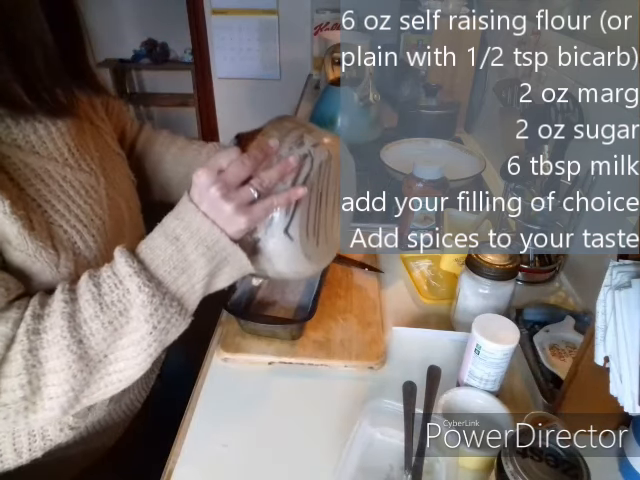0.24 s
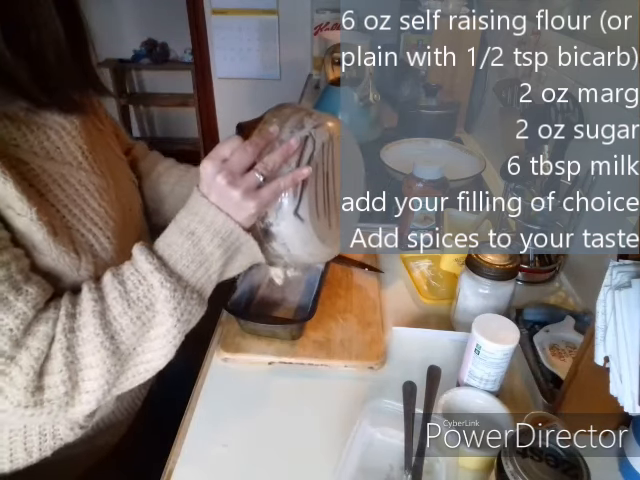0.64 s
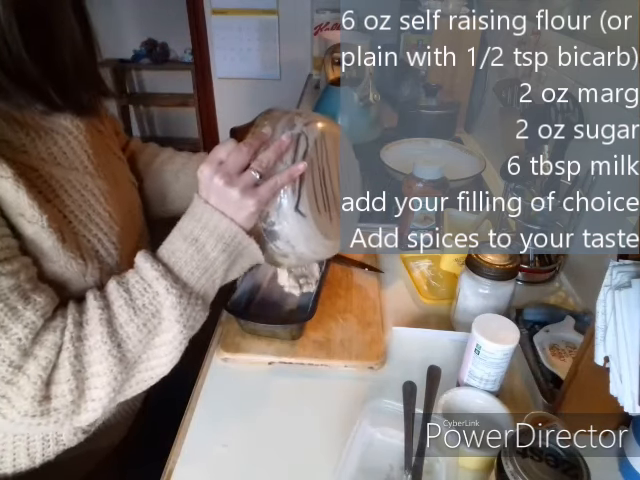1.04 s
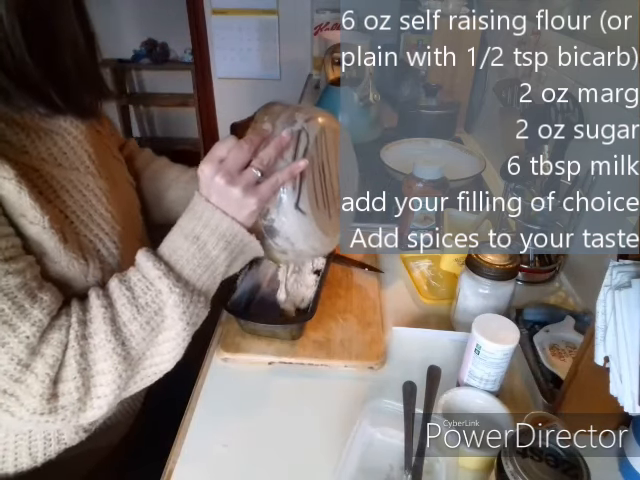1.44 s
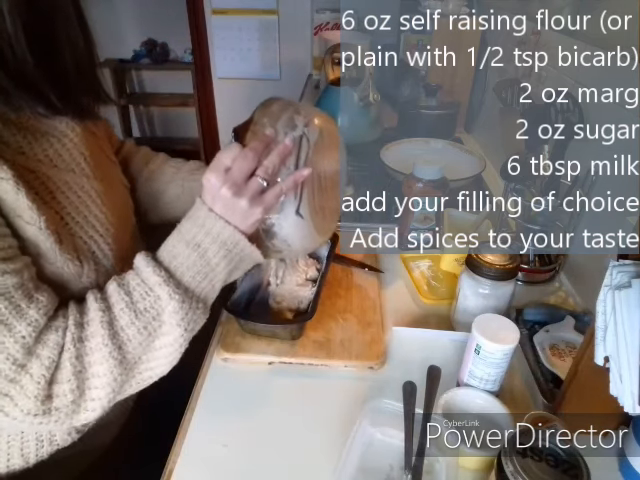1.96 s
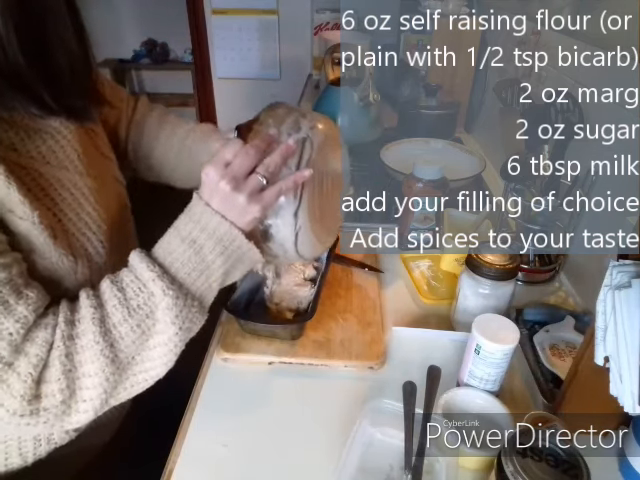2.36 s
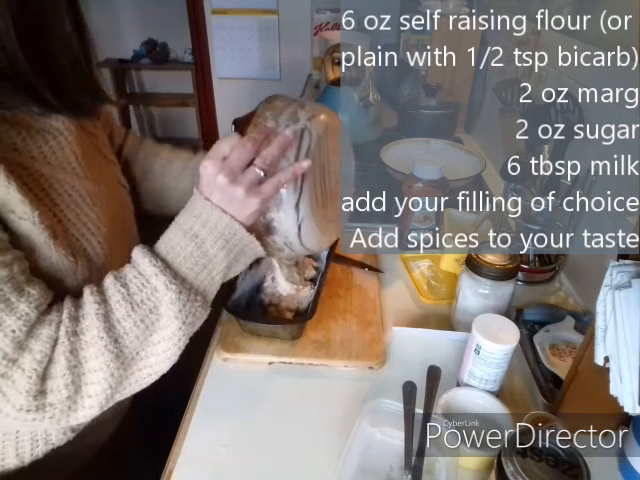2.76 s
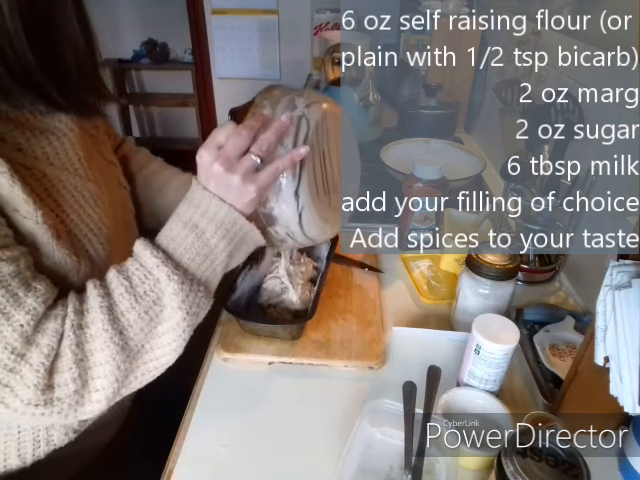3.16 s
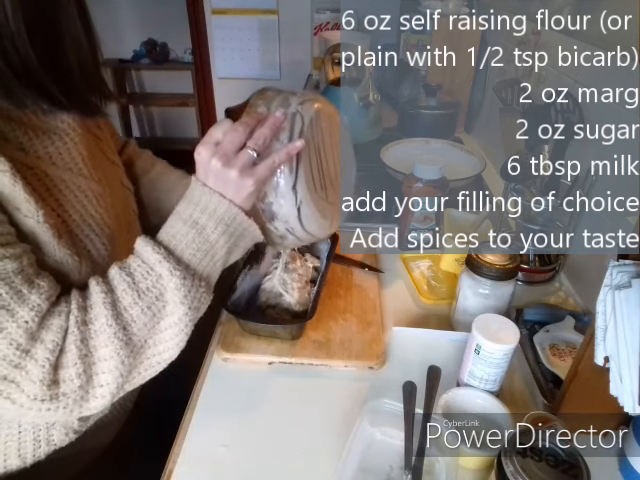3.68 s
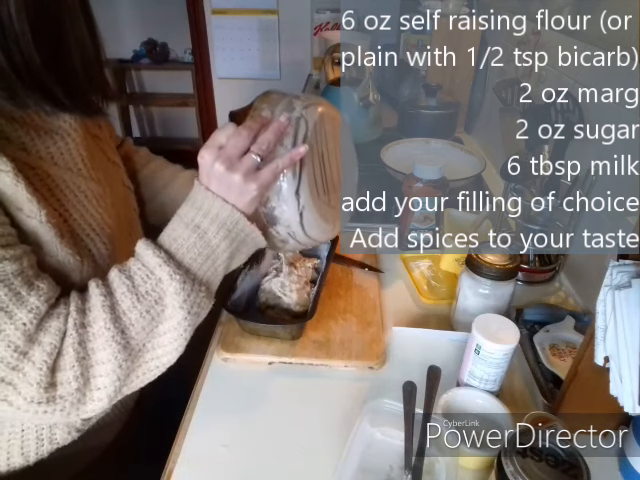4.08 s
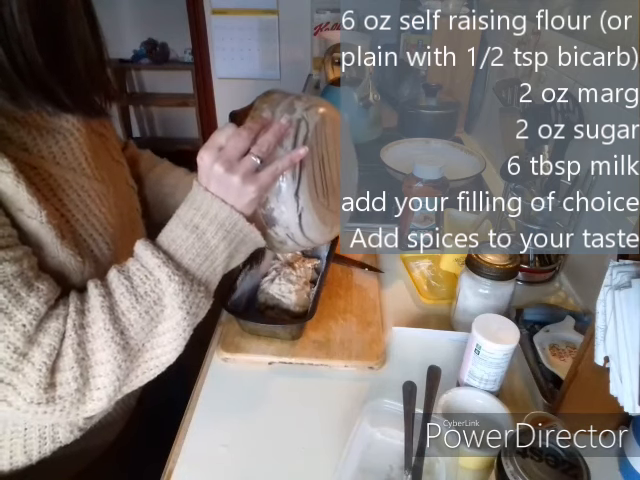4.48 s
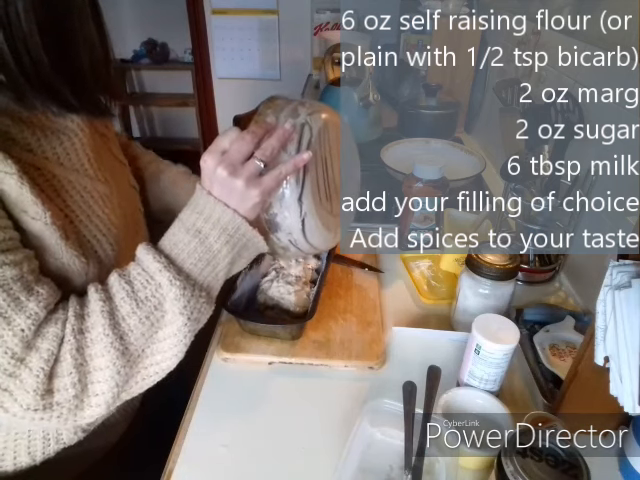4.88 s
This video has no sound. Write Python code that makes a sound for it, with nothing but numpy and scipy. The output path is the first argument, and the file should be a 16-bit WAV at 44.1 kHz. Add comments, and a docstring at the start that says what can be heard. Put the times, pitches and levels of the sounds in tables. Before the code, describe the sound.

Close, centred spoon-on-bowl knocking while batter is scraped out. The clacks are bright in the mid-highs yet damped by batter and fingers, so the bowl hardly rings. Busy uneven taps open, spaced heavier hits follow, soft scratching fills a lull, and a quick scraping rattle closes. A small room adds a short tail over low air noise and a very faint appliance hum.

```python
"""A metal spoon knocks and scrapes inside a hand-held stoneware mixing bowl, half muffled by batter and fingers.
Each knock is a short noise clack plus damped bowl modes; each scrape is a stream of random slips driving them.
A small kitchen answers every contact with decaying noise; shaped noise makes the air and a faint appliance hum.
The image is nearly mono, and the knocks lean towards 1-4.5 kHz."""
import sys
import numpy as np
from scipy import signal
from scipy.fft import rfft, irfft, next_fast_len
from scipy.io import wavfile
from scipy.ndimage import uniform_filter1d

SR = 44100
rng = np.random.default_rng(int(sys.argv[2]) if len(sys.argv) > 2 else 0)


def wrap_up_sound(samples):
    """Save the sound to the file named by the first command line argument, as 16-bit audio."""
    columns = np.atleast_2d(samples).T
    # keep every value between -1 and 1, then stretch to whole-number steps
    tamed = np.clip(columns, -1, 1)
    steps = np.round(tamed * 32767).astype(np.int16)
    wavfile.write(sys.argv[1], SR, steps)


N = 226806

# noise colour of metal on glaze: f/Hz, relative level/dB
CONTACT_COLOUR = [(90, -61.5), (250, -24), (450, -40.5), (600, -8.5), (800, -19.5), (1050, -23),
                  (1450, -4.5), (1850, -10), (2500, -6), (3200, -6.5), (3900, -0.5), (4800, -19),
                  (6200, -28.5), (6900, -27), (9500, -43), (11500, -52), (13000, -44), (16000, -53)]


def amp(db):
    """dB to linear gain."""
    return 10 ** (np.asarray(db) / 20)


def unit(x):
    """Scale a signal to rms 1."""
    return x / np.sqrt(np.mean(x ** 2) + 1e-20)


def along(points, hz):
    """Read a curve of (Hz, value) points on a log frequency axis."""
    f, v = np.transpose(points)
    return np.interp(np.log(hz + 1), np.log(f + 1), v)


def filtered(x, response):
    """Filter x with a zero-phase gain given as a function of frequency."""
    m = next_fast_len(x.shape[-1] + 8192)
    gain = response(np.fft.rfftfreq(m, 1 / SR))
    return irfft(rfft(x, m) * gain, m)[..., :x.shape[-1]]


def coloured(n, spectrum_db):
    """Noise of rms 1, coloured by a dB function of frequency."""
    return unit(filtered(rng.standard_normal(n), lambda hz: amp(spectrum_db(hz))))


def add(track, s, x):
    """Mix x into the track from time s on."""
    part = track[round(s * SR):][:len(x)]
    part += x[:len(part)]


def blows():
    """A blow is a short broad clack plus the ringing wall; where it lands shifts the balance of tones."""
    # spoon blows: t/s, level/dB, rim tone/dB, wall tone/dB, clear mode/dB, 3 kHz tone/dB,
    # brightness/dB, ring length/factor
    blow_list = [(0.0267, -9.5, -16, -13, -46, -2.5, -26, 0.46),
                 (0.0996, -27, -17.5, -2, -23, -1.5, -26.5, 0.75),
                 (0.2824, -14, -12, -8, -18, -8.5, -27.5, 0.81),
                 (0.3336, -22.5, -11.5, -14.5, -10, 0, -21.5, 0.74),
                 (0.5435, -53, 4.5, -3.5, -11, -5, -17, 0.97), (0.612, -54.5, -13, -2.5, -2, -3, -6.5, 0.7),
                 (0.6536, -43.5, -2, -2.5, -6.5, -6.5, -27, 1.34),
                 (0.7163, -46, -13, -18, -28, -3, -24, 0.63), (0.8392, -10, -26.5, -12, -10, -8, -25, 0.49),
                 (0.9289, -29, -11, -13, -17.5, -4.5, -16, 1.65),
                 (1.1079, -18, -18, -8.5, -8, -2, -16.5, 0.57),
                 (1.1923, -37.5, -7.5, -6, -4, 0, -21.5, 1.62),
                 (1.3908, -22.5, -16, -9.5, -6.5, -4.5, -17.5, 0.91),
                 (1.6494, -41, -11.5, -7.5, -4.5, -0.5, -19.5, 1.13),
                 (1.7532, -47.5, -6, -3, -19, -5, -16, 1.5), (1.954, -23, -20, -18, -5.5, 2.5, -34, 0.98),
                 (2.0881, -23.5, -19.5, -8, -26, -5, -28.5, 0.58),
                 (2.4724, -6.5, -32, -9, -32.5, -10.5, -27.5, 0.95),
                 (2.744, -6, -22.5, -6, -7, -8, -20.5, 1.27),
                 (3.0424, -55.5, 10.5, -3.5, -3.5, -10, -21, 1.2),
                 (3.0955, -51, -24, -16, -5, -9, -25, 1.2), (3.1376, -42, -18.5, -12, -9, -2, -32, 1.3),
                 (3.3356, -46.5, -10, -19, -18, -13, -26, 1.26),
                 (3.4189, -41, -34, -8, -5.5, -3.5, -40, 0.78),
                 (3.6216, -33, 1.5, -6, -13, -11, -24.5, 0.41),
                 (3.6654, -46, -20.5, -1, -22, -8, -29, 0.64),
                 (3.6945, -43.5, -16.5, -20, -9, -8, -19, 1.3),
                 (3.7267, -31.5, -22, -27.5, -20, -9.5, -28.5, 0.87),
                 (3.92, -45.5, 8.5, 2, -26, -10, -14, 0.6),
                 (3.9536, -40, -25.5, -28, -20, -20, -18.5, 0.41),
                 (3.9966, -33.5, -50, -12.5, -30, -7.5, -29, 0.86),
                 (4.032, -34.5, -40, -23, -25.5, -9, -35, 0.52), (4.207, -33.5, -3, 2, -15, -10, -27, 1.12),
                 (4.3012, -19.5, -34.5, -26.5, -25, -8.5, -31.5, 0.55),
                 (4.482, -15, -13.5, 2, -8, -7.5, -38, 0.62), (4.569, -35, -36, -13, -25, -2, -25, 0.6),
                 (4.7547, -31.5, -4.5, -0.5, -22, -8, -34.5, 1.2), (4.797, -23, -18, -7, -25, -11, -34, 2),
                 (4.837, -10.5, -35.5, -11.5, -27, -19, -29, 0.64)]
    rise_ms = 0.63  # how fast a contact builds up
    upper_follows = 0.71  # dB of upper-wall tone per dB of wall tone
    edge_follows = 1.3  # dB of top edge per dB of brightness
    lead = 128  # samples of silence ahead of each contact
    out = np.zeros(N)
    t = np.arange(SR // 6) / SR
    usual = np.median(blow_list, axis=0)[2:7]  # each blow is voiced relative to this balance
    rise = 1 - np.exp(-t * 1000 / rise_ms)
    for s, db, *balance, length in blow_list:
        rim_db, wall_db, clear_db, belly_db, bright_db = balance - usual
        upper_db = upper_follows * wall_db
        edge_db = edge_follows * bright_db
        colour = [(60, rim_db - 30), (300, rim_db), (700, rim_db),
                  (1250, wall_db), (1800, wall_db), (2250, upper_db), (2650, upper_db),
                  (2900, belly_db), (3300, belly_db), (3550, 0), (4500, 0),
                  (5500, bright_db), (8000, bright_db), (10500, edge_db)]
        length = np.clip(length, .3, 1.8)
        clack_decay = amp(-60 * t / (0.066 * length))
        clack = coloured(len(t), lambda hz: along(CONTACT_COLOUR, hz)) * clack_decay
        modes = amp(-9.5) * ring(t, length, clear_db - (wall_db + upper_db) / 2)
        sound = kitchen(np.pad((clack + modes) * rise, (lead, 0)))
        # before the tone shaping, energy follows ring length alone; the blow's level comes after
        sound = sound / np.linalg.norm(sound) * np.sqrt(length)
        shaped = filtered(sound, lambda hz: amp(along(colour, hz)))
        add(out, s - lead / SR, amp(db + 21.0) * shaped)
    return out


def strokes():
    """The spoon edge stutters over the glaze: dense uneven slips hiss and drive the bowl's modes."""
    # spoon strokes along the wall: start t/s, press/s, lift/s, level/dB, wall tone/dB, brightness/dB
    stroke_list = [(0.356, 0.016, 0.032, -49, 3, -4), (0.631, 0.019, 0.049, -55.5, 2.5, -5),
                   (0.699, 0.013, 0.085, -52, -6, -17), (1.21, 0.011, 0.021, -60.5, 10, -18),
                   (1.451, 0.026, 0.056, -49, -6, -14), (1.685, 0.034, 0.047, -52, -9, -11.5),
                   (1.729, 0.023, 0.04, -52.5, 1, -19), (1.835, 0.015, 0.016, -54.5, -12, -17),
                   (2.19, .015, .04, -53, -8, -17.5), (2.235, 0.019, 0.061, -52.5, -7.5, -19),
                   (2.706, 0.021, 0.037, -56.5, -2.5, -7.5), (2.94, 0.041, 0.021, -49.5, -9, -22.5),
                   (3.085, 0.0096, 0.05, -57, -4, -6), (3.13, 0.018, 0.019, -40.5, -5.5, -24),
                   (3.39, 0.034, .012, -56.5, -4, -17), (3.422, 0.0096, 0.031, -42.5, -12.5, -23.5),
                   (3.63, .012, 0.14, -53, -3.5, -15), (3.718, .014, 0.051, -41, -9.5, -29),
                   (3.94, 0.034, 0.033, -56.5, -11, -11.5), (3.99, 0.046, 0.022, -50, -1.5, -17),
                   (4.259, .038, 0.015, -37, -13, -26.5), (4.303, .008, 0.034, -46, -11, -16),
                   (4.572, 0.022, 0.034, -22.5, -16, -22), (4.7, 0.043, .015, -48.5, -3, -13),
                   (4.79, 0.016, 0.018, -31.5, -2, -21.5), (4.811, 0.025, 0.013, -21.5, -8.5, -16),
                   (4.838, 0.0069, 0.009, -9, -9.5, -27.5), (4.85, 0.0074, 0.025, -23, -4, -21)]
    slips_per_s = 4000
    touch_db, leave_db = -11, -17  # pressure at first touch and lift-off, relative to the stroke's level
    # sliding barely moves the rim
    slide_colour = [(60, -39.5), (400, -17.5), (700, -19), (1300, 4.0), (9000, 4.5), (13000, -7.0)]
    out = np.zeros(N)
    t = np.arange(SR // 8) / SR
    usual = np.median(stroke_list, axis=0)[4:]
    for s, press_s, lift_s, db, wall_db, bright_db in stroke_list:
        end = press_s + lift_s
        now = np.arange(0, end + .15, 1 / SR)

        slip_now = rng.random(len(now)) < slips_per_s / SR
        slip_size = amp(2.5 * rng.exponential(size=len(now)))
        slips = slip_now * slip_size * rng.standard_normal(len(now))
        contact = np.clip(np.minimum(now, end - now) / .005, 0, 1)  # 5 ms fades at both ends
        swell_db = np.interp(now, [0, press_s, end], [touch_db, 0, leave_db])
        pressure = contact * amp(db + swell_db)

        wall = ring(t, 1.0, -3.5)
        grit = coloured(len(t), lambda hz: along(CONTACT_COLOUR, hz))
        grit = grit * amp(-60 * t / 0.026) * (1 - np.exp(-t / .0003))
        body = wall / np.linalg.norm(wall) + 1.2 * grit / np.linalg.norm(grit)

        sound = signal.fftconvolve(slips * pressure, body)[:len(now)]
        sound = filtered(sound, lambda hz: amp(along(slide_colour, hz)))
        sound = sound * np.linalg.norm(pressure) / np.linalg.norm(sound)
        low = filtered(sound, lambda hz: 1 / (1 + (hz / 2900) ** 10))
        high = filtered(sound, lambda hz: 1 / (1 + (4900 / (hz + 1)) ** 8))
        # flat of the spoon: fuller; edge of the spoon: brighter
        fuller = (amp(wall_db - usual[0]) - 1) * low
        brighter = (amp(bright_db - usual[1]) - 1) * high
        add(out, s, amp(-3.5) * kitchen(sound + fuller + brighter))
    return out


def ring(t, length, clear_db):
    """Decaying bowl modes, struck at new strengths each time; batter and fingers make each one waver."""
    # bowl modes: f/Hz, typical level/dB, t60/s at length 1
    modes = [(588, -5, .075), (1257, -12, .045), (1456, -1, .06), (1748, -10, .045), (2007, -6, .11),
             (2165, -9, .05), (2260, -3, .06), (2365, -10, .06), (2640, -2, .075), (2975, -8, .06),
             (3280, -12, .05), (3583, -3, .08), (3680, -5, .06), (3835, -1, .075), (4020, -8, .05),
             (4225, -8, .055), (5040, -22, .035), (5780, -24, .035), (6720, -15, .04), (8660, -29, .03)]
    clear_mode = 4  # row of the least damped mode, which only some contacts wake
    hz, db, t60 = np.transpose(modes)[:, :, None]
    luck = rng.standard_normal((len(modes), 1))
    drift = uniform_filter1d(rng.standard_normal((len(modes), len(t))), size=60, axis=1)
    waver = np.cumsum(drift, axis=1) * 0.025  # wandering phase, rad
    db = db + 1.5 * luck
    db[clear_mode] += clear_db
    level = amp(db - 60 * t / (t60 * length))
    tone = np.sin(2 * np.pi * hz * t + waver - waver[:, :1])
    return np.sum(level * tone, axis=0)


def kitchen(x):
    """Add a fresh room answer: a noise tail in which each frequency dies at its own speed."""
    # small kitchen: f/Hz, t60/s, answer level/dB
    answer = [(200, .35, -15), (544, 0.21, -1), (1400, 0.22, -5), (3726, 0.24, -2), (9700, .26, 1.5)]
    hz, t, z = signal.stft(rng.standard_normal(SR // 2), SR, nperseg=256)
    f, t60, db = np.transpose(answer)
    t60 = np.clip(np.interp(hz, f, t60), .05, 1)[:, None]
    decaying = z * amp(-60 * t / t60) / np.sqrt(t60)
    tail = signal.istft(decaying, SR, nperseg=256)[1]
    # the nearest surface is under a metre away
    tail = np.pad(tail / np.linalg.norm(tail), (SR // 400, 0))
    tail = filtered(tail, lambda hz: amp(np.interp(hz, f, db)))
    wet = signal.fftconvolve(x, tail)
    return np.pad(x, (0, len(wet) - len(x))) + wet


def room_tone():
    """Steady air noise, narrow noise bands of hum and a faint noise of opposite sign in each channel."""
    # air noise colour: f/Hz, relative level/dB
    air = [(20, -30.5), (40, 1), (60, -4.5), (125, 1), (200, -3.5), (300, 1), (600, -2), (1000, -3.5),
           (1800, -11), (3000, -8), (4200, -11), (5000, -21.5), (8000, -25.5), (10000, -30), (13000, -22),
           (16000, -34)]
    # colour of the left-right difference: f/Hz, relative level/dB
    side_air = [(15, -54), (25, -22.5), (111, -4.5), (326, -3.5), (2410, -9.5), (4030, -18.5),
                (8360, -20.5), (13600, -18.5), (16000, -37.5)]
    # appliance hum bands: centre f/Hz, width f/Hz between -6 dB points, rms level/dB
    hum = [(50, 5, -83), (280, 12, -79), (3060, 100, -73.5)]
    mid = amp(-64) * coloured(N, lambda hz: along(air, hz))
    for centre_hz, width_hz, db in hum:
        band = coloured(N, lambda hz: -20 * np.log10(1 + ((hz - centre_hz) / width_hz * 2) ** 2))
        mid = mid + amp(db) * band
    side = amp(-73.5) * coloured(N, lambda hz: along(side_air, hz))
    return np.array([mid + side, mid - side])


def scene():
    """Spoon and bowl in the centre over the room tone."""
    return blows() + strokes() + room_tone()


def record(dry):
    """Cut everything above the band limit."""
    top_hz = 15900
    return filtered(dry, lambda hz: hz < top_hz)


dry = scene()
out = record(dry)
wrap_up_sound(out)
```